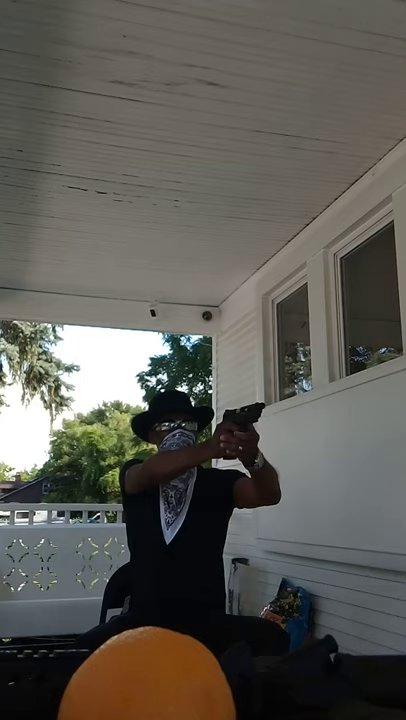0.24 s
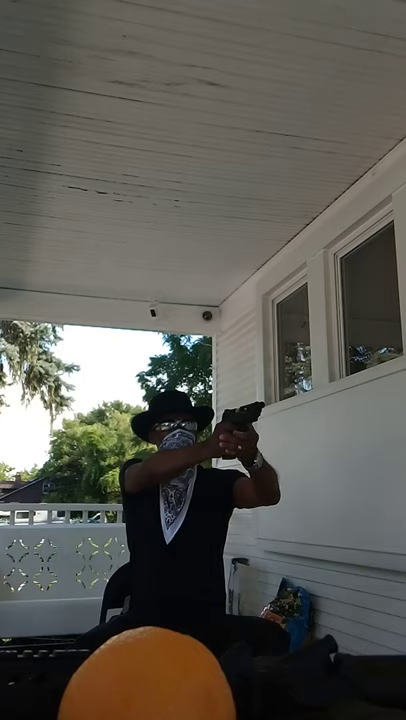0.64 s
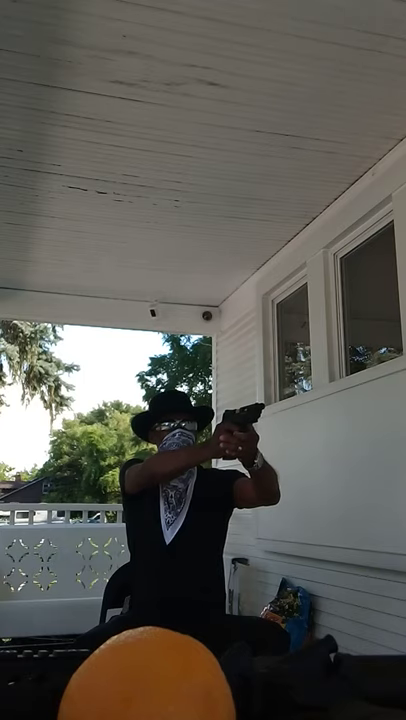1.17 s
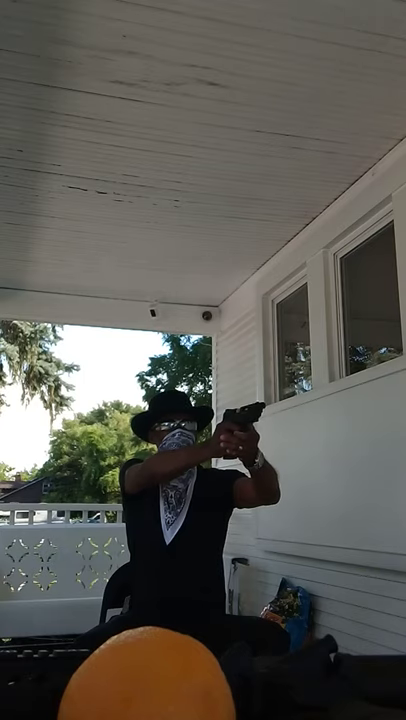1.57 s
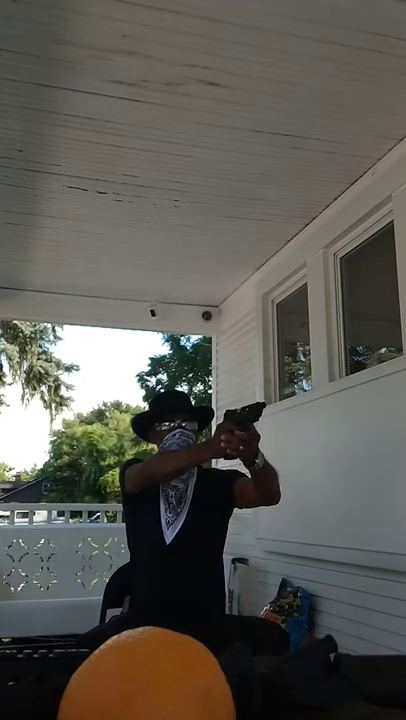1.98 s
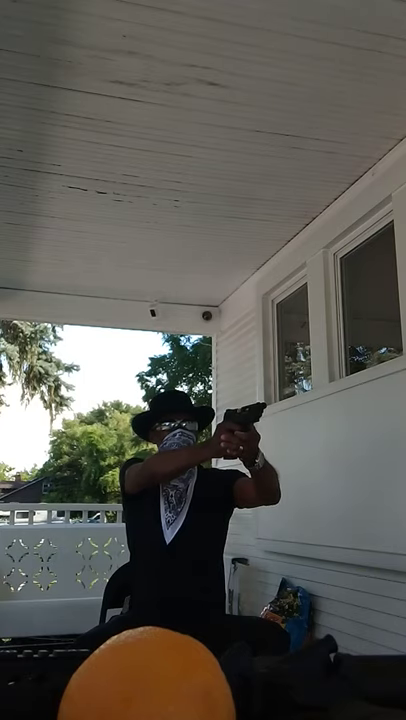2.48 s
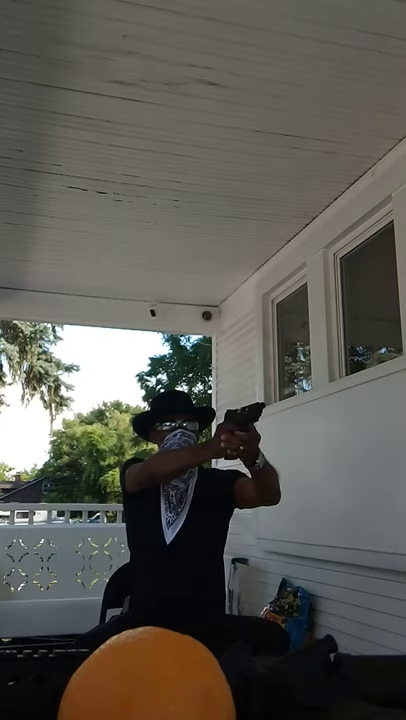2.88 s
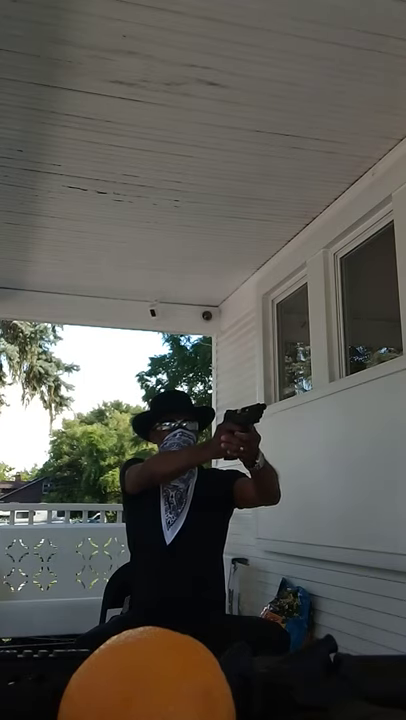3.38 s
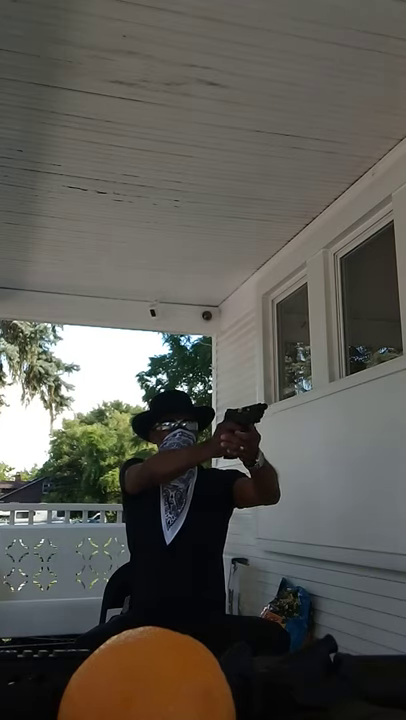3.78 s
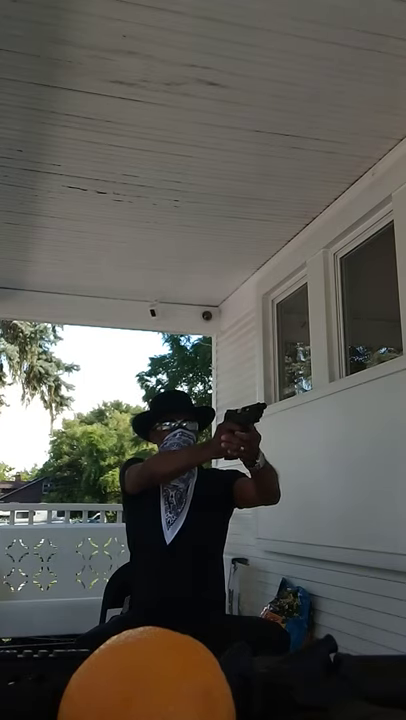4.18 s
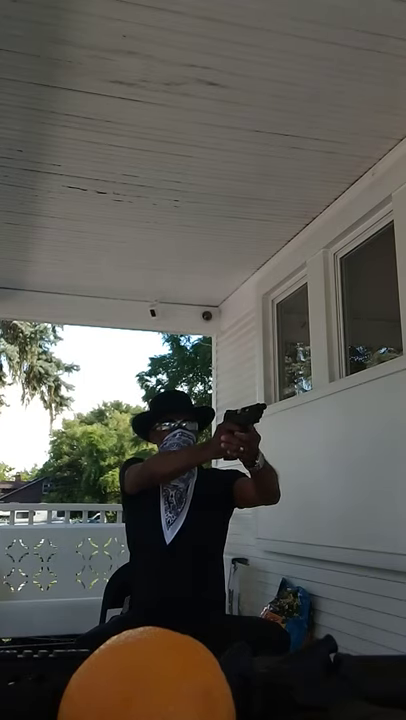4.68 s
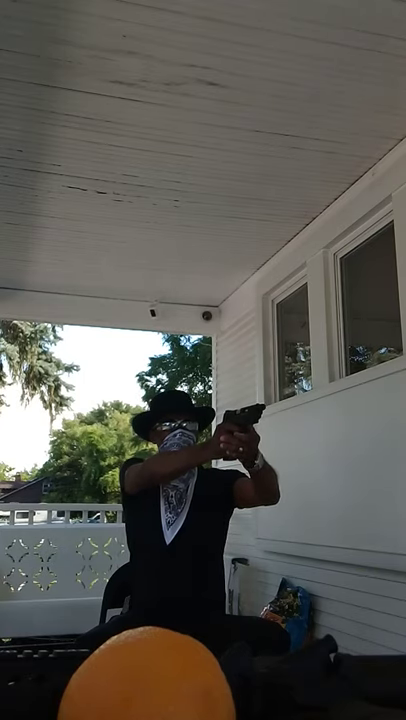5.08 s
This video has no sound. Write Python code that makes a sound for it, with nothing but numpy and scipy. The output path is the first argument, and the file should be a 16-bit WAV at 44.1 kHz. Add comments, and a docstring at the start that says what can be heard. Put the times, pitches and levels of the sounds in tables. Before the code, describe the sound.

A faint, high insect hiss and a low rumble of distant traffic run throughout, heard from a covered wooden porch. In the first 0.4 seconds a spent pellet ticks lightly across the floorboards. A gas pellet pistol, a few steps from the small microphone, fires at about 0.5 and 1.8 seconds, in quick pairs at 2.6 and 2.8 and at 3.6 and 3.9, and once more at 4.7. Each shot is a tiny trigger click, a loud, bright crack with a low puff of gas, an almost immediate smack on a hollow target, and a light metallic reset click. The shots briefly overload the microphone, making the sound dip before a short porch echo swells back. More pellets bounce quietly on the boards from 3.1 to 3.5 seconds and from 4.4 to 4.7. The last shot dies away into the yard by about 5.3 seconds.

```python
"""A wooden porch, a small microphone a few steps from a gas pistol. Insects hiss in the trees over
faint traffic and a spent pellet bounces on the boards. Then come seven shots, each one cycle: the
trigger clicks, the valve lets out a crack and a puff of gas, the pellet smacks a hollow target, the
trigger resets. Each shot overloads the microphone and ducks its limiter. More pellets bounce between
the later shots, and the last shot dies away into the yard."""
import sys
import numpy as np
from scipy import signal
from scipy.fft import rfft, irfft
from scipy.io import wavfile
from scipy.ndimage import uniform_filter1d, minimum_filter1d

SR = 44100
rng = np.random.default_rng(int(sys.argv[2]) if len(sys.argv) > 2 else 0)


def wav_out(sig):
    """Save sig, one row per channel (or a flat mono array), as 16-bit PCM at SR to the path in sys.argv[1]."""
    wavfile.write(sys.argv[1], SR, np.round(np.clip(np.atleast_2d(sig).T, -1, 1) * 32767).astype(np.int16))


N = 235449

# The pistol, a few steps from the microphone. Each row: start in seconds, strength in dB, trigger
# click's lead in seconds, its level in dB, hold after the shot in seconds, reset click in dB, hit on
# the target in dB. Levels are relative within each column.
SHOTS = [(0.5413, 2.5, .0253, -29.5, 0.2, -26, -8.5), (1.8165, 0.5, .022, -28, 0.17, -25, -12.5),
         (2.5594, 2, 0.03, -28.5, .1227, -42, -7), (2.7597, -0.5, .0195, -28, 0.13, -29.5, -10.5),
         (3.63, 0.5, 0.021, -26.5, .1251, -28, -10.5), (3.8560, 0.3, 0.022, -26, 0.13, -29, -10.5),
         (4.7480, -1, 0.019, -25, 0.16, -25, -14.5)]
# The pistol's barrel and frame. Each row: pitch in Hz, relative level in dB, t60 in seconds.
PISTOL_MODES = [(1094, -5.5, 0.019), (1636, -6, 0.037), (2605, -2.5, 0.017), (2920, -3, 0.036),
                (3960, -10.5, 0.029), (4360, -12.5, 0.057), (5330, -7, 0.028), (5610, -1.5, 0.03),
                (6345, -1.5, 0.04), (6620, -0.5, 0.022), (6680, -2.5, 0.047), (7240, -7.5, 0.025),
                (7600, -0.5, .05), (8593, 1, 0.024), (9750, -5.5, 0.029), (10170, -1, 0.0093),
                (15460, -4, 0.015)]
# The crack at the valve. Each row: frequency in Hz, relative level in dB.
CRACK_SPECTRUM = [(100, -21.5), (350, -16.5), (600, -15), (950, -1), (1500, 0), (2500, -0.5), (4000, 0),
                  (6300, 0.5), (9000, -3), (15000, -3.5)]

def cracks(jet_db=-5, jet_echo_db=-10):
    """The valve opens with a crack that rings the barrel, and a short jet of gas hisses out behind it."""
    snaps, jets = np.zeros(N), np.zeros(N)
    for start, db, *_ in SHOTS:
        snap = amp(db) * strike(CRACK_SPECTRUM, PISTOL_MODES, ring_db=-6, detune=0.014)
        add(snaps, start, snap)
        add(jets, start, np.linalg.norm(snap) * spray(CRACK_SPECTRUM, t60=0.064, tilt=0.6))
    return amp(-1) * porch(snaps + amp(jet_echo_db) * jets, direct_db=-15) + amp(jet_db) * jets


# The puff at the muzzle. Each row: frequency in Hz, relative level in dB.
PUFF_SPECTRUM = [(25, -17), (55, -13.5), (90, -2), (135, 4), (200, -0.5), (270, 4), (350, -3), (450, 1),
                 (750, -4.5), (1500, -4), (2500, -7.5), (5000, -36)]

def puffs(gain_db=-7, length_s=0.015, steepness=6):
    """The gas swirls out of the muzzle as a brief, low thud, much the same in colour each time."""
    thuds, t = np.zeros(N), np.arange(4096) / SR
    envelope = 1 / (1 + (t / length_s) ** steepness)
    for start, db, *_ in SHOTS:
        eddies = rfft(rng.standard_normal(len(t)) * envelope)
        flat_noise = irfft(eddies / (abs(eddies) + 1e-12))
        thud = unit_energy(colour(flat_noise * envelope, PUFF_SPECTRUM)) * np.sqrt(length_s * SR)
        add(thuds, start, amp(db + gain_db) * thud)
    return thuds


# The target, a short flight away. Each row: pitch in Hz, relative level in dB, t60 in seconds.
TARGET_MODES = [(533, -6.5, 0.1), (790, -6.5, 0.048), (931, -1, 0.1), (1180, -0.5, 0.12), (1340, -5, 0.09),
                (1626, 9, 0.042)]
# The smack on the target. Each row: frequency in Hz, relative level in dB.
IMPACT_SPECTRUM = [(100, -28.5), (330, -23), (500, -8), (750, -13), (1200, 7), (2000, -3), (4000, -6.5),
                   (8000, -11), (15000, -12.5)]

def impacts(crunch_db=-1, flight_s=0.0409, flight_growth_s=0.00068):
    """Each pellet smacks a new spot on the hollow target and crunches through it."""
    smacks, crunches = np.zeros(N), np.zeros(N)
    for fired, (shot_s, *_, db) in enumerate(SHOTS):
        hit_s = shot_s + flight_s + flight_growth_s * fired  # slower each shot as the gas cools
        smack = amp(db) * strike(IMPACT_SPECTRUM, TARGET_MODES, ring_db=-3.5, detune=0.036)
        add(smacks, hit_s, smack)
        add(crunches, hit_s + 0.002, np.linalg.norm(smack) * spray(IMPACT_SPECTRUM, t60=0.058))
    return amp(-3) * porch(smacks, direct_db=-9, yard_db=-21.5) + amp(crunch_db) * crunches


# The trigger parts and their spring. Each row: pitch in Hz, relative level in dB, t60 in seconds.
STEEL_MODES = [(2057, -4, 0.037), (2930, -8.5, 0.061), (4880, 2, 0.036), (5860, 2, 0.031), (8300, -4, .07),
               (8700, -6, 0.054), (9800, -7, .1), (12700, -0.5, 0.07), (11700, 1, 0.055), (15337, -7, .04)]
# The click of the trigger. Each row: frequency in Hz, relative level in dB.
CLICK_SPECTRUM = [(100, -59), (350, -53), (800, -19.5), (1600, -6.5), (3000, -5), (6500, -0.5), (9500, 5),
                  (12000, 2), (15000, -5.5)]

def trigger(rattle_db=-2):
    """Small steel parts click, ring and rattle briefly as the trigger is pulled and let go."""
    ticks, rattles = np.zeros(N), np.zeros(N)
    for shot_s, _, lead_s, pull_db, held_s, reset_db, _ in SHOTS:
        for start, db, tilt in trigger_cycle(shot_s, lead_s, pull_db, held_s, reset_db):
            tick = amp(db) * strike(CLICK_SPECTRUM, STEEL_MODES, ring_db=0, tilt=tilt, detune=0.016)
            rattle = spray(CLICK_SPECTRUM, t60=0.083, tilt=tilt, spikiness=2.5)
            add(ticks, start, tick)
            add(rattles, start, np.linalg.norm(tick) * rattle)
    return amp(-1.5) * porch(ticks, direct_db=-10.5, yard_db=-40) + amp(rattle_db) * rattles


def trigger_cycle(shot_s, lead_s, pull_db, held_s, reset_db, pull_tilt=-2.4, slow_hold_s=0.15):
    """One pull and release. Each click: start in seconds, relative level in dB, tilt in dB per octave."""
    pull_s, reset_s = shot_s - lead_s, shot_s + held_s
    reset_tilt = 12.4 - 47 * held_s  # brighter the sooner the finger lets go
    clicks = [(pull_s - 0.013, -43, pull_tilt),  # a faint tick as the slack is taken up
              (pull_s, pull_db, pull_tilt),
              (reset_s, reset_db, reset_tilt)]
    if held_s > slow_hold_s:
        clicks.append((reset_s - 0.02, -37.5, -6.5))  # slides back with a dull scrape
    return clicks


# Pellets landing on the porch. Each row: start in seconds, relative level in dB, tilt in dB per octave.
LANDINGS = [(0.089, -33, 6), (0.231, -45, 0.5), (0.366, -47, -3), (3.082, -25.5, 2.5), (3.197, -35.5, -4.5),
            (3.518, -45.5, -5.5), (4.3756, -32, -3.5), (4.474, -29.5, -2), (4.604, -50, -2),
            (4.692, -43, -1.5)]
# The floorboards. Each row: pitch in Hz, relative level in dB, t60 in seconds.
BOARD_MODES = [(872, -1.5, 0.049), (1504, 1.5, 0.047), (1680, 6, 0.011), (1870, -5, .03),
               (3018, 8.5, 0.022), (4420, -17, .04), (6200, -11, 0.065)]
# A pellet's tick on wood. Each row: frequency in Hz, relative level in dB.
BOUNCE_SPECTRUM = [(150, -27.5), (600, -15.5), (1000, -5), (1700, 2), (3000, 1), (6000, 2.5), (9000, -5.5),
                   (15000, -19.5)]

def bounces(skid_db=-5, tumble_below_db=-32, graze_lead_s=0.0062, graze_db=-9, graze_tilt=-6.5):
    """Spent pellets tick and skid on the boards, which answer with a hollow knock."""
    knocks, skids = np.zeros(N), np.zeros(N)
    # a pellet that lands softly tumbles, and its rim grazes the board first
    grazes = [(start - graze_lead_s, db + graze_db, graze_tilt)
              for start, db, _ in LANDINGS if db < tumble_below_db]
    for start, db, tilt in [*LANDINGS, *grazes]:
        knock = amp(db) * strike(BOUNCE_SPECTRUM, BOARD_MODES, ring_db=-9.5, tilt=tilt, detune=0.027)
        add(knocks, start, knock)
        add(skids, start, np.linalg.norm(knock) * spray(BOUNCE_SPECTRUM, t60=0.066, tilt=tilt + 1))
    return porch(knocks, direct_db=-15, porch_db=-2.5, yard_db=-29.5) + amp(skid_db) * skids


def strike(spectrum, modes, ring_db, tilt=0, detune=0):
    """One sharp pulse and the modes that it sets ringing, with the energy of 20 ms at full level."""
    t = np.arange(SR // 8) / SR
    pulse = unit_energy(colour(1. * (t == 0), spectrum, tilt))
    hz, db, t60 = np.transpose(modes)[:, :, None]
    # the spot that is struck sets each mode's sign and shifts its pitch a little
    shift, side = rng.standard_normal((2, *hz.shape))
    tones = np.sign(side) * np.cos(2 * np.pi * hz * (1 + detune * shift) * t)
    ring = np.sum(amp(db - 60 * t / t60) * tones, axis=0)
    return unit_energy(pulse + amp(ring_db) * unit_energy(ring)) * np.sqrt(0.02 * SR)


def spray(spectrum, t60, tilt=0, spikiness=1):
    """A dying burst of noise of unit energy; spikiness turns it from a hiss into a rattle."""
    t = np.arange(SR // 8) / SR
    noise = rng.standard_normal(len(t))
    grains = np.sign(noise) * abs(noise) ** spikiness
    return unit_energy(colour(grains * amp(-60 * t / t60), spectrum, tilt))


# Floor, wall and ceiling near the microphone. Each row: delay in seconds, gain in dB.
ECHOES = [(.0022, -15), (.0044, -14.5), (.0077, -8.5), (0.0097, -16), (0.015, -17), (0.0206, -15.5),
          (0.027, -15.5)]
# Decay under the porch roof, and out in the yard. Each row: frequency in Hz, t60 in seconds.
PORCH_T60 = [(100, .1), (300, 0.2), (600, 0.26), (1100, 0.31), (3000, 0.27), (6500, 0.26), (10000, 0.22),
             (15000, 0.12)]
YARD_T60 = [(100, 0.65), (500, 1), (1200, 0.94), (3000, 0.9), (6500, 0.67), (10000, 0.44), (15000, 0.38)]

def porch(x, direct_db, porch_db=-2, yard_db=-17):
    """The direct sound, slaps off the nearest boards, the ring of the porch and a faint yard wash."""
    response = amp(porch_db) * reverb_tail(PORCH_T60, build_up_s=0.002)
    response += amp(yard_db) * reverb_tail(YARD_T60, build_up_s=0.003)
    response[0] += amp(direct_db)
    for delay, db in ECHOES:
        add(response, delay, amp([db]))
    return signal.fftconvolve(x, response)[:N]


def reverb_tail(t60s, build_up_s, first_per_s=6000, crowding_s=0.25):
    """Reflections, separate at first and then ever denser, each band dying at its own speed."""
    t = np.arange(SR * 3 // 4) / SR
    density = np.minimum(first_per_s / SR + (t / crowding_s) ** 2, 1)
    reflections = rng.standard_normal(len(t)) * (rng.random(len(t)) < density) / np.sqrt(density)
    hz, age, bands = signal.stft(reflections, SR, nperseg=256)
    decay = amp(-60 * age / curve_at(t60s, hz)[:, None])
    dying = signal.istft(bands * decay, SR, nperseg=256)[1][:len(t)]
    return unit_energy(dying * (1 - np.exp(-t / build_up_s)))


# Insects, off in the trees. Each row: frequency in Hz, relative level in dB.
INSECT_SPECTRUM = [(2000, -37), (4000, -32.5), (4600, -11), (5800, -11.5), (6500, -6), (7100, -3),
                   (7600, -6.5), (8100, -3.5), (8800, -8), (9900, -35), (16000, -63)]
# Their chorus as it reaches the porch. Each row: time in seconds, level in dB.
CHORUS_LEVELS = [(0, -50.5), (1.2, -52), (2.4, -54.5), (3.4, -55.5), (4.65, -53.5), (5.34, -55)]

def insects(shimmer_db=1.1):
    """A distant chorus merges into a high, slightly shimmering hiss."""
    level_db = np.interp(np.arange(N) / SR, *np.transpose(CHORUS_LEVELS))
    level_db += shimmer_db * wander(rate_hz=40)
    return amp(level_db) * unit_rms(colour(rng.standard_normal(N), INSECT_SPECTRUM))


# Streets far from the porch. Each row: frequency in Hz, relative level in dB.
TRAFFIC_SPECTRUM = [(25, -76), (60, -9.5), (110, -1.5), (180, -2), (300, -15), (550, -7.5), (920, -2),
                    (1100, -6.5), (1600, -11), (2500, -32.5), (4000, -52), (12000, -39)]

def traffic(level_db=-59, swell_db=3):
    """Far streets give a low, uneven rumble with a little tyre noise."""
    swell = amp(level_db + swell_db * wander(rate_hz=12))
    return swell * unit_rms(colour(rng.standard_normal(N), TRAFFIC_SPECTRUM))


def wander(rate_hz):
    """Slow random drift of unit size."""
    hz = np.fft.rfftfreq(N, 1 / SR)
    lowpass = np.exp(-(hz / rate_hz) ** 2) * (hz > 0)
    return unit_rms(irfft(rfft(rng.standard_normal(N)) * lowpass, N))


def colour(x, spectrum, tilt=0):
    """Minimum-phase filter with the given spectrum, tilted in dB per octave about 4 kHz."""
    hz = np.fft.rfftfreq(4096, 1 / SR)
    db = curve_at(spectrum, hz) + tilt * np.log2(np.maximum(hz, 500) / 4000)
    log_gain = np.log(amp(np.r_[db, db[-2:0:-1]]))
    response = np.exp(np.conj(signal.hilbert(log_gain)))[:len(hz)]
    return signal.oaconvolve(x, irfft(response))[:len(x)]


def curve_at(points, hz):
    """Reads a table along a logarithmic frequency axis."""
    point_hz, values = np.transpose(points)
    return np.interp(np.log(hz + 1), np.log(point_hz + 1), values)


def amp(db):
    """Decibels to gain."""
    return 10 ** (np.asarray(db) / 20)


def unit_rms(x):
    """Scales a sound to a mean power of one."""
    return x / np.sqrt(np.mean(x ** 2) + 1e-20)


def unit_energy(x):
    """Scales a short sound to a total energy of one."""
    return x / np.sqrt(np.sum(x ** 2) + 1e-20)


def add(mix, start_s, sound):
    """Mixes a sound in at a time."""
    part = mix[max(round(start_s * SR), 0):][:len(sound)]
    part += sound[:len(part)]


def scene():
    """The pistol and its pellets under the porch roof, with the outdoors behind."""
    return (cracks() + puffs() + impacts() + trigger() + bounces() + insects() + traffic())[None]


def limiter(x, threshold_db=-14, ahead_s=0.014, hold_s=0.071, release_db_per_s=170):
    """Turns down just ahead of a loud sound, holds, then lets the reverberation swell back."""
    power_db = 10 * np.log10(abs(uniform_filter1d(x ** 2, size=300)) + 1e-12)
    over_db = np.maximum(power_db - threshold_db, 0)
    span, lead = int((hold_s + ahead_s) * SR), int(ahead_s * SR)
    held_db = -minimum_filter1d(-over_db, span, origin=(span - 1) // 2 - lead)
    recovery_db = np.arange(N) / SR * release_db_per_s
    cut_db = np.maximum.accumulate(held_db + recovery_db) - recovery_db
    return x * amp(-uniform_filter1d(cut_db, lead))


# The small microphone on the porch. Each row: frequency in Hz, gain in dB.
MICROPHONE_RESPONSE = [(100, -1), (4200, -4), (5400, -0.5), (6600, 2.5), (8200, -5), (10000, -5),
                       (11200, -10), (12800, -15), (13900, -11), (14700, -4), (15500, 0), (16100, -14.5)]

def record(dry, overload_db=5, cutoff_hz=16000):
    """The microphone saturates and colours the sound; then come the limiter and the band limit."""
    ceiling = amp(overload_db)
    saturated = ceiling * np.tanh(dry[0] / ceiling)
    limited = limiter(colour(saturated, MICROPHONE_RESPONSE))
    lowpass = signal.firwin(301, cutoff_hz, window=("kaiser", 8), fs=SR)
    return signal.oaconvolve(limited, lowpass, "same")[None]


dry = scene()
out = record(dry)
wav_out(out)
```